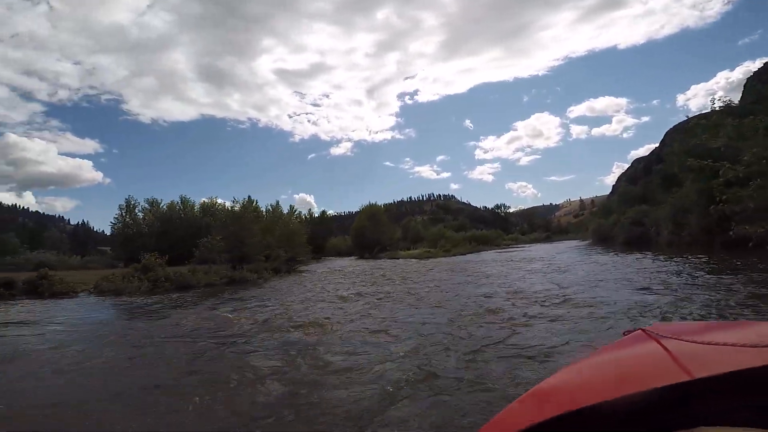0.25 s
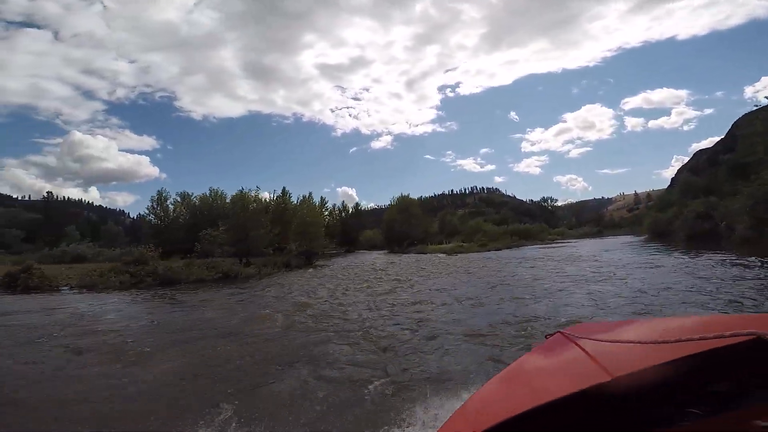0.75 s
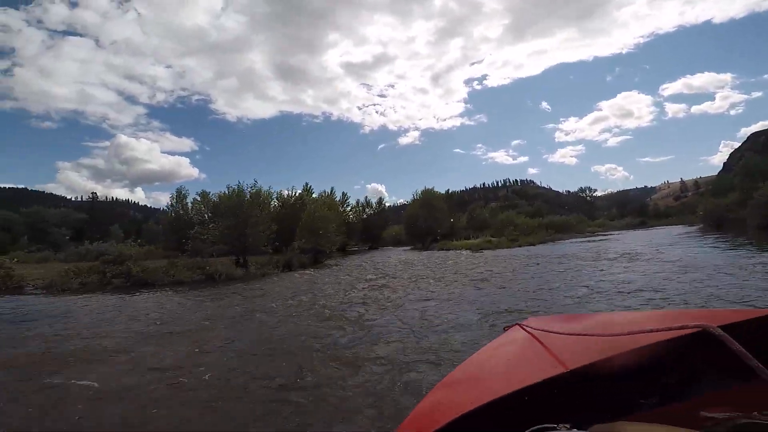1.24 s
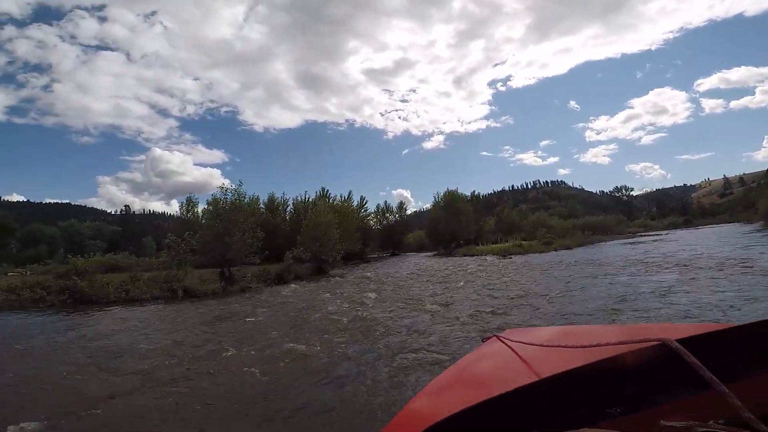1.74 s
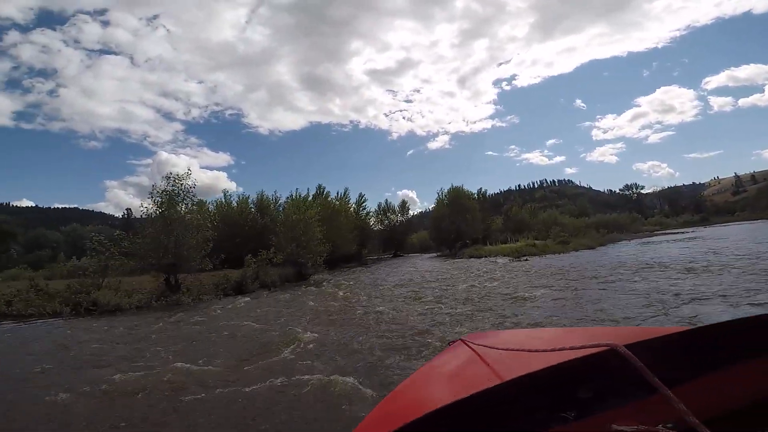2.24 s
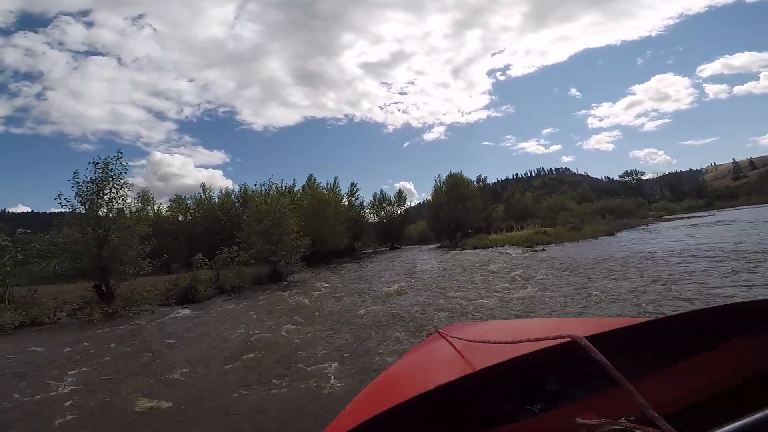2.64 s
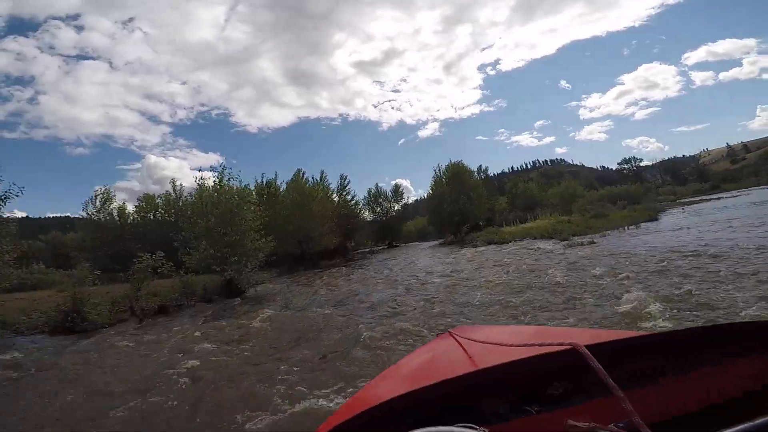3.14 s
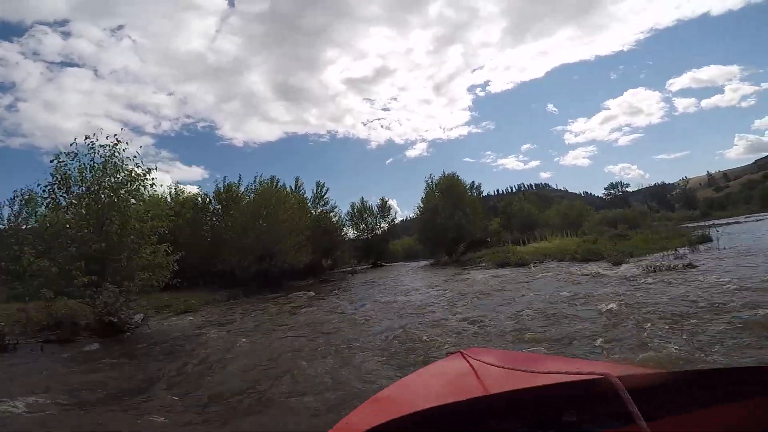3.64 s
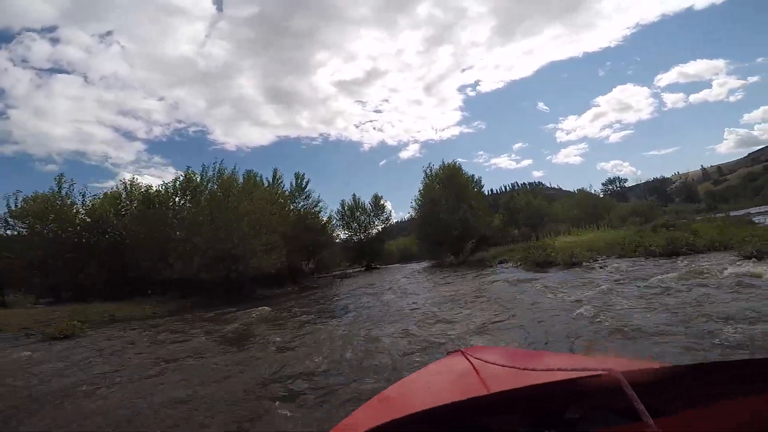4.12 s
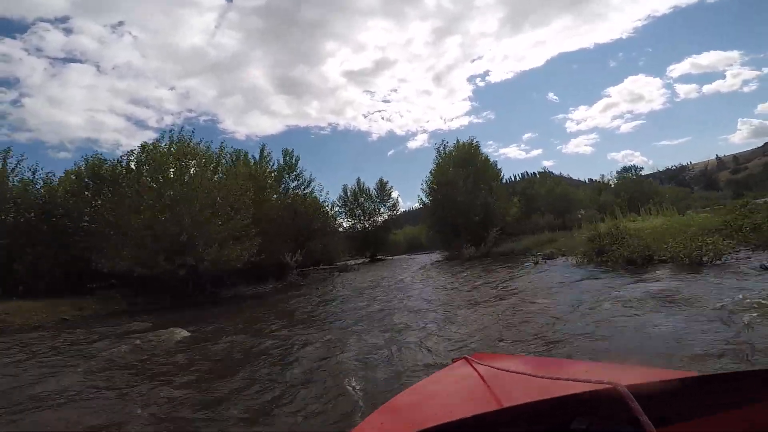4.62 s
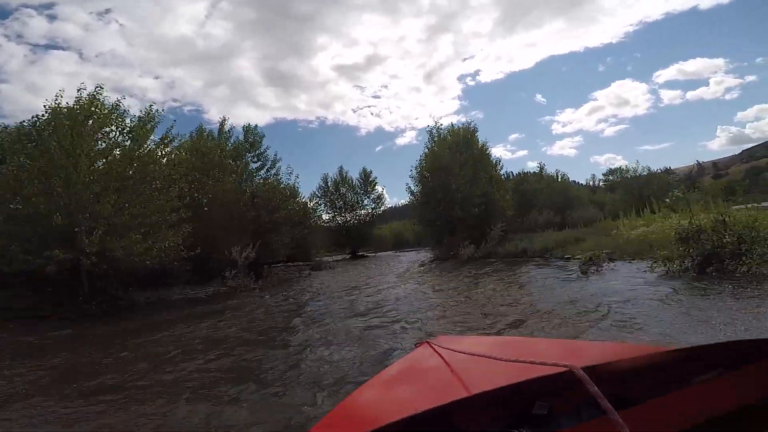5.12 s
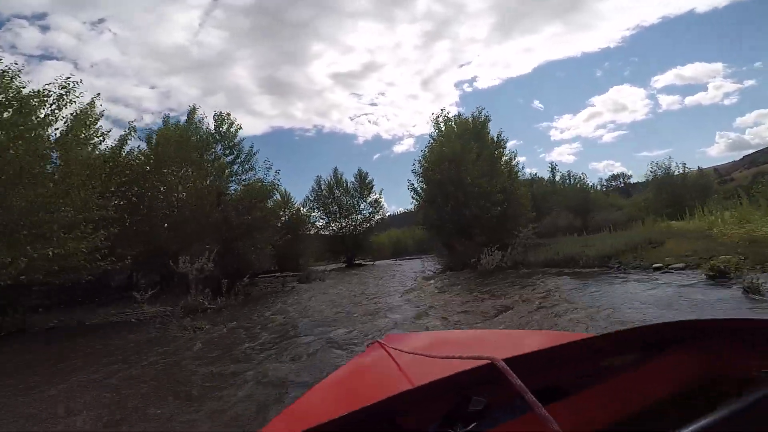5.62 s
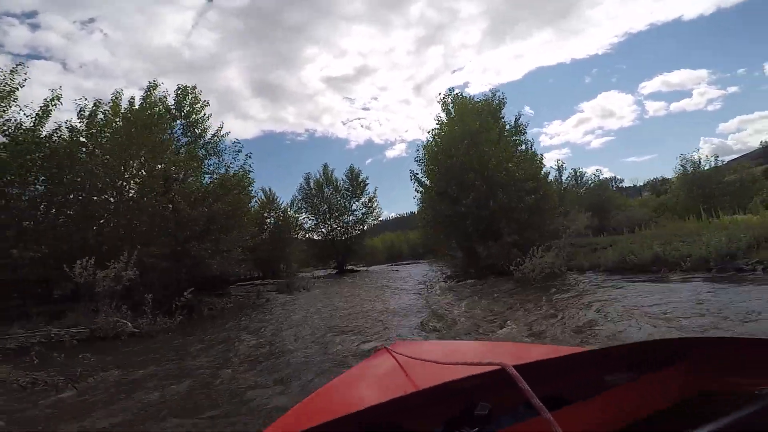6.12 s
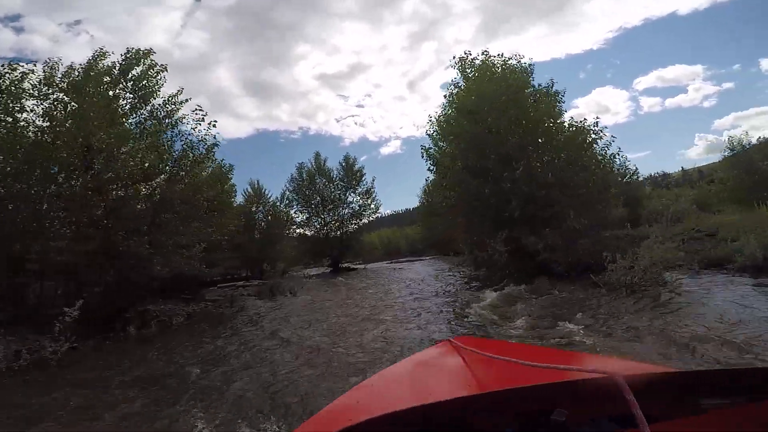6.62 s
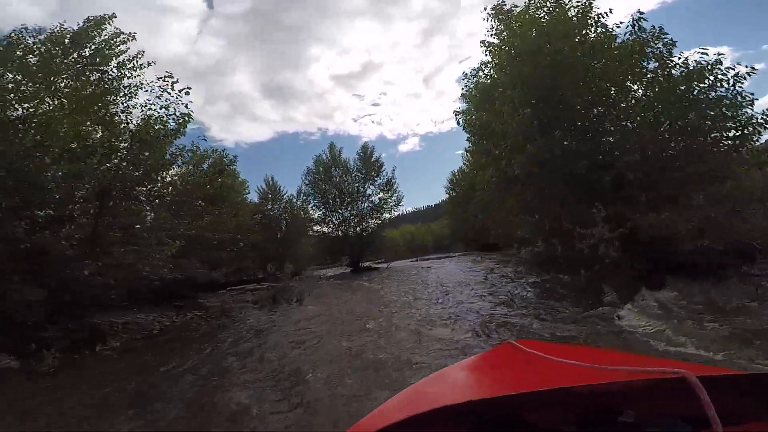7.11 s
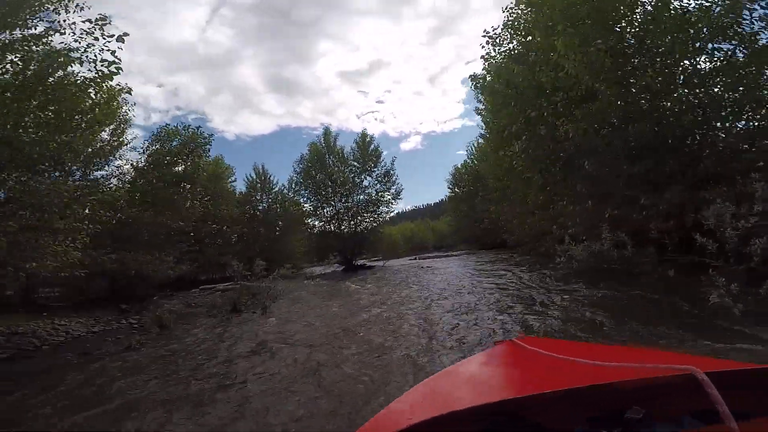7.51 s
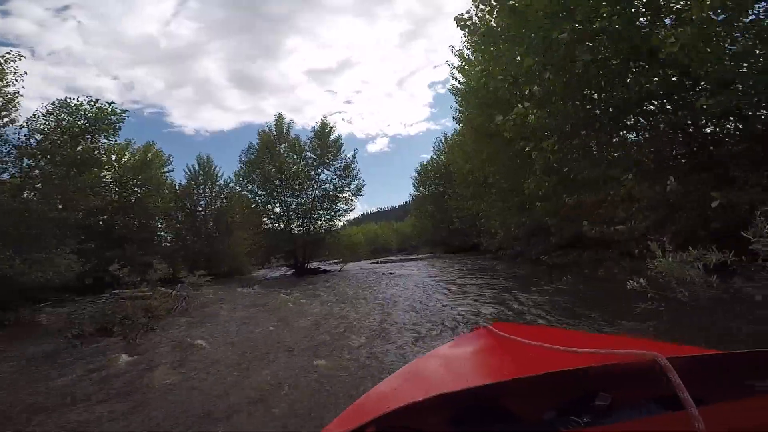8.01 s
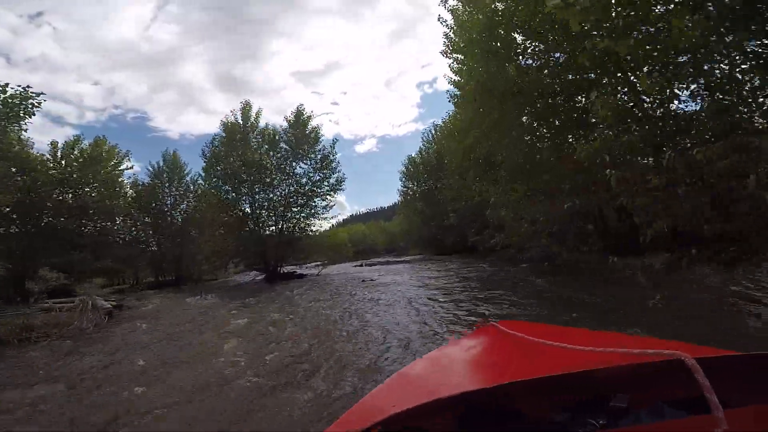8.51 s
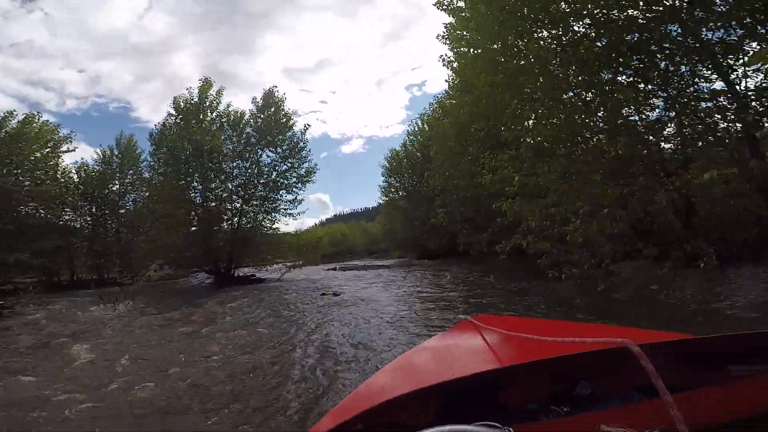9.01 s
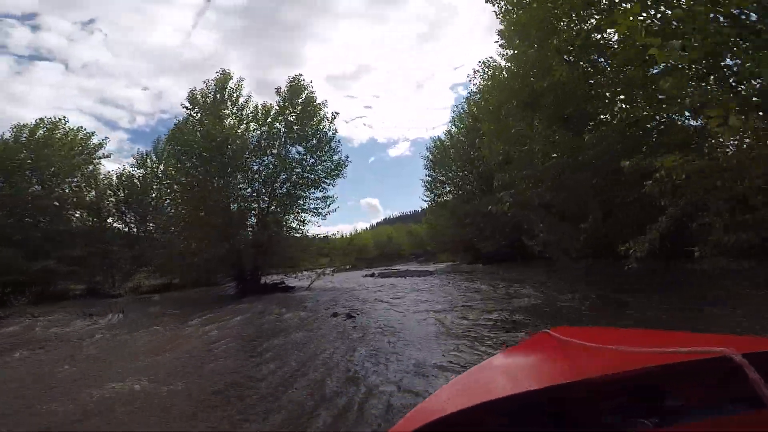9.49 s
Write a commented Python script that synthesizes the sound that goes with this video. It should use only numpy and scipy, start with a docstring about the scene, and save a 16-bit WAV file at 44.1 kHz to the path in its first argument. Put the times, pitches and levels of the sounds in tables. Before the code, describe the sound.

A small jet boat runs along a river, heard from on board. Its exhaust drones and buzzes, revving high at first, easing midway, then surging and dropping several times in quick succession. A rough rumble booms through the hull, spray hisses and wind gusts buffet the microphone. Around the middle, waves slap the bow, it lands with a few deep thumps, and a panel starts ringing in faint metallic squeals.

```python
"""A small jet boat runs up a river, heard from on board. From the start its exhaust drones and barks,
rising and falling with the throttle. A rough, low rumble booms through the hull, water sprays off the bow,
the water jet hisses, wind buffets the microphone and a hull panel rings faintly. At 2.5 seconds the
sound opens from mono to stereo and waves begin to slap the bow. At 3.8 seconds the bow first lands with
a thump, and from about 4.8 seconds the panel rings with the engine in short squeals."""
import sys
import numpy as np
from scipy import signal
from scipy.fft import rfft, irfft, next_fast_len
from scipy.io import wavfile
from scipy.ndimage import uniform_filter1d, minimum_filter1d

SR = 44100
rng = np.random.default_rng(int(sys.argv[2]) if len(sys.argv) > 2 else 0)


def unload_wav(signal):
    """Save mono or channel-first audio to the path in sys.argv[1] as 16-bit WAV at rate SR, clipped to [-1, 1]."""
    wavfile.write(
        sys.argv[1],
        SR,
        np.round(np.clip(np.atleast_2d(signal).T, -1, 1) * 32767).astype(np.int16),
    )


N = 429960


def from_db(db):
    """Turn decibels (dB) into a number to multiply a sound by."""
    return np.exp(np.asarray(db) * (np.log(10) / 20))


def rms_one(x):
    """Scale a sound so that the average of its channels has a strength (rms) of 1."""
    return x / np.sqrt(np.mean(np.atleast_2d(x).mean(axis=0) ** 2) + 1e-20)


def in_time(rows):
    """Join rows of (seconds, value) into a curve with a value for every sample."""
    return np.interp(np.arange(N) / SR, *np.transpose(rows))


def at_hz(rows, hz):
    """Look up a pitch in rows of (Hz, value), giving every octave equal room."""
    row_hz, value = np.transpose(rows)
    return np.interp(np.log(hz), np.log(row_hz), value)


def along(rows, hz):
    """Look up a gliding pitch every 100 samples and fill in between."""
    return np.interp(np.arange(N), np.arange(N)[::100], at_hz(rows, hz[::100]))


def drift(rate_hz):
    """A smooth random wobble of typical size 1; a higher rate makes it quicker."""
    step = 40   # samples per random value
    r = np.exp(-2 * np.pi * step * rate_hz / SR)
    slow = signal.lfilter([1], [1, -2 * r, r * r], rng.standard_normal(N // step + 2002))[2000:]
    return np.interp(np.arange(N) / step, np.arange(len(slow)), rms_one(slow))


def arch(peak_s, length_s):
    """A smooth rise from 0 to 1 and back."""
    return np.cos(np.pi * np.clip((np.arange(N) / SR - peak_s) / length_s, -.5, .5)) ** 2


def swells(rows):
    """A loudness curve with one arch for each row."""
    return sum(from_db(db) * arch(peak_s, length_s) for peak_s, length_s, db in rows)


def resonance(x, hz, width_hz):
    """Keep the part of a sound near one pitch, as a ringing object does."""
    r = np.exp(-np.pi * width_hz / SR)
    feedback = [1, -2 * r * np.cos(2 * np.pi * hz / SR), r * r]
    return signal.lfilter(np.array([1, 0, -1]) * (1 - r * r) / 2, feedback, x)


def split(x, hz):
    """Cut a sound into its parts below and above a pitch."""
    return [signal.sosfilt(signal.butter(3, hz, side, fs=SR, output="sos"), x)
            for side in ("low", "high")]


# Which side is louder. Each row: pitch in Hz, left minus right in dB.
BALANCE = [(60, 2), (160, -1), (270, -1.5), (360, -3), (450, -6), (730, -11.5), (1200, -7.5), (2000, -6),
           (5400, -4.5), (8800, 3), (14600, -6.5)]
# How alike the two sides are. Each row: pitch in Hz, likeness from 0 to 1.
LIKENESS = [(60, .66), (160, 0.89), (370, 0.91), (520, 0.5), (730, .25), (850, .5), (1100, .68),
            (1900, .66), (2600, 0.62), (4000, 0.54), (5000, .22), (7000, 0.49), (9500, 0.35), (11500, .2)]
# How late the left side is. Each row: pitch in Hz, lag in radians (6.28 is one whole wave).
LEFT_LAG = [(60, 0.47), (420, 0.52), (600, 1.23), (730, 1.8), (820, 3.5), (1000, 4), (2000, 4.5),
            (3000, 4.5), (4500, 6.5), (5200, 9), (7000, 9.2), (10000, 9.5), (11500, 11)]
def ports(hz):
    """How the microphone's two openings hear a pitch: left gain, right gain, likeness and lag."""
    left = from_db(at_hz(BALANCE, hz) / 2)
    alike = np.clip(at_hz(LIKENESS, hz), 0, .99)
    lag = at_hz(LEFT_LAG, hz)
    centre = np.sqrt(left ** 2 + left ** -2 + 2 * alike * np.cos(lag)) / 2
    return left / centre, 1 / left / centre, alike, lag


def right_first(x):
    """Sound reaches the right opening before the left one."""
    size = next_fast_len(N)
    hz = np.maximum(np.arange(size // 2 + 1) * SR / size, 1)
    shift = np.exp(.5j * at_hz(LEFT_LAG, hz) * [[-1], [1]])
    return irfft(rfft(x, size) * shift, size)[:, :N]


def stereo_tone(phase, hz, level):
    """One pure tone as it reaches both openings, the right one first."""
    left, right, _, lag = ports(hz[::100])
    left, right, half_lag = (uniform_filter1d(np.repeat(np.float32(curve), 100), 100)[:N]
                             for curve in (left, right, lag / 2))
    phase = np.float32((phase + rng.uniform(0, 2 * np.pi)) % (2 * np.pi))
    return level * np.array([left * np.sin(phase - half_lag), right * np.sin(phase + half_lag)])


def banded_noise(spectrum, flicker_db, flicker_hz):
    """Stereo noise in bands a third of an octave wide, which swell together and flicker on their own."""
    out, together = np.zeros((2, N)), drift(flicker_hz / 2)
    edges = 16 * 2 ** (np.arange(31) / 3)
    white = rng.standard_normal((2, 2, N))
    for k, (low, high) in enumerate(zip(edges, edges[1:])):
        hz = np.sqrt(low * high)
        if spectrum[0][0] < hz < spectrum[-1][0]:
            band = signal.butter(2, [low, high], "band", fs=SR, output="sos")
            mid, side = signal.sosfilt(band, white[k % 2])
            left, right, alike, _ = ports(hz)
            mid, side = mid * np.sqrt(1 + alike), side * np.sqrt(1 - alike)
            level = from_db(at_hz(spectrum, hz) + flicker_db * (together + drift(flicker_hz)))
            out += level * np.array([left * (mid + side), right * (mid - side)])
    return rms_one(right_first(out))


# How fast the engine runs. Each row: time in seconds, crankshaft turns per second.
ENGINE_SPEED = [(0.0, 37), (0.1, 46), (0.19, 60), (0.28, 64.8), (0.38, 64.5), (0.5, 62.7), (0.65, 68.4),
                (0.82, 75.0), (0.95, 80.3), (1.2, 82), (1.7, 79.5), (2.08, 76.7), (2.2, 71.7), (2.35, 65.2),
                (2.5, 72.4), (2.66, 81.6), (2.85, 87.5), (3.06, 90.7), (3.2, 91.4), (3.36, 88.7),
                (3.48, 79.3), (3.62, 63.7), (3.75, 57.2), (4.02, 62), (4.21, 59.6), (4.35, 55.5),
                (4.46, 51.3), (4.6, 47.3), (4.78, 40.7), (5.07, 44), (5.2, 52), (5.32, 59), (5.45, 61.5),
                (5.7, 63), (5.95, 62.9), (6.22, 59.6), (6.38, 52), (6.5, 49.2), (6.62, 53.4), (6.8, 63.4),
                (6.95, 71.3), (7.05, 72.3), (7.12, 54.8), (7.22, 42.2), (7.34, 35.2), (7.48, 29.1),
                (7.64, 44.6), (7.74, 57.2), (7.84, 65.2), (8.0, 65.7), (8.12, 55.9), (8.26, 49.6),
                (8.38, 55), (8.53, 64.8), (8.78, 80.5), (8.93, 84.6), (9.0, 76.4), (9.1, 55.6), (9.25, 41),
                (9.45, 32.4), (9.56, 41), (9.66, 56), (9.75, 59.0)]
# How hard the engine works. Each row: time in seconds, level of its bark in dB.
ENGINE_LOAD = [(0, -31.5), (.15, -33), (.4, -28.5), (.78, -23.5), (1, -29.5), (1.65, -29), (2.1, -27.5),
               (2.57, -28.5), (2.68, -31), (2.96, -33), (3.06, -28.5), (3.33, -28.5), (3.46, -33),
               (3.66, -30.5), (3.9, -30.5), (4.55, -27.5), (4.8, -30.5), (5.3, -27.5), (5.6, -27.5),
               (6.05, -26), (6.35, -27), (6.6, -29), (6.8, -26.5), (7.03, -24.5), (7.3, -37), (7.6, -28),
               (8.45, -30), (8.66, -22.5), (8.84, -27), (8.97, -25.5), (9.1, -44), (9.4, -36.5),
               (9.58, -30), (9.75, -29)]
BEST_SPEED = 58.6   # turns per second; below this the exhaust's tones fade
def throttle(flywheel_s=.06, pull_db=0.1, drop_db=2.5, coast_below_db=-31.5):
    """The flywheel smooths the speed; effort rises a little with the revs and sinks off the throttle."""
    speed = uniform_filter1d(in_time(ENGINE_SPEED), int(flywheel_s * SR), mode="nearest")
    surge = np.tanh(np.gradient(speed) * SR / 31)   # +1 revving up, -1 dropping back
    load_db = in_time(ENGINE_LOAD)
    coasting_db = 0.99 * np.minimum(load_db - coast_below_db, 0)
    effort_db = np.where(surge > 0, pull_db, drop_db) * surge + coasting_db
    return speed, surge, load_db, effort_db


def crankshaft(speed, roughness, wobble=0.00091, stumble=.003):
    """The shaft's angle; its speed wavers a little, and stumbles more when the rumble is strong."""
    waver = (wobble + stumble * roughness ** 2) * drift(13.6)
    return 2 * np.pi * np.cumsum(speed * (1 + waver)) / SR


# Pitches at which exhaust and cockpit ring. Each row: pitch in Hz, width in Hz, level in dB.
DRONE_RESONANCES = [(70.5, 16.2, -13), (106.2, 25, -15.5), (137.2, 16, -16), (159.8, 46.4, -11),
                    (183.4, 16, -13.5), (218, 30, -13.5), (248.6, 8.6, -15), (262.5, 29, -8.5),
                    (325.9, 18.5, -9.5), (352.2, 25.2, -7), (400.3, 28, -10), (446, 35.3, -12),
                    (473.9, 14.8, -13.5), (501, 14, -17.5), (561.7, 40.6, -19)]
# Pitches at which the cockpit cancels the drone. Each row: pitch in Hz, width in Hz, change in dB.
DEAD_SPOTS = [(375, 10, -2), (493, 8, -7.5), (519, 13, -8)]
def cockpit_gain(hz):
    """How strongly exhaust and cockpit carry a tone gliding through their resonances and dead spots."""
    def nearness(centre, width):
        return 1 / (1 + (2 * (hz[::100] - centre) / width) ** 2)
    power = sum((from_db(db) * nearness(centre, width)) ** 2 for centre, width, db in DRONE_RESONANCES)
    dead_db = sum(db * nearness(centre, width) for centre, width, db in DEAD_SPOTS)
    return np.interp(np.arange(N), np.arange(N)[::100], np.sqrt(power) * from_db(dead_db))


# The exhaust's strong tones. A tone's "order" is its waves per turn of the shaft; 2 is the firing rate.
# Each row: order, relative level in dB, dB lost for each turn per second below the best speed.
FIRING_ORDERS = [(1, -4, 0.5), (2, 1.34, 0.2), (4, 0.47, 0.14), (6, 0, 0.47), (8, -1, 0.38)]
# The deep once-per-turn tone, which fades at full revs. Each row: time in seconds, change in dB.
LOWEST_TONE = [(0, -2), (.7, 1), (1.2, -3.5), (2.2, 2.5), (2.65, 1), (2.92, -9.5), (3.6, -5), (8.3, -5),
               (8.78, -12), (9.3, -3)]
# One tone dips briefly. Each row: middle in seconds, length in seconds, change in dB, order.
DIPS = [(.35, 0.64, -10, 2), (.82, 0.081, -16, 2), (2.15, 0.078, -18, 2), (2.3, .09, -13, 2),
        (2.5, 0.1, -16, 4), (3.17, .09, -7, 2), (3.404, 0.056, -10, 4), (6.96, .1, -9, 4),
        (7.854, 0.12, -13, 2), (8.91, .06, -8, 2)]
# Weaker tones from unequal cylinders. Each row: pitch in Hz, relative level in dB.
UNEVEN_SPECTRUM = [(120, -26.5), (240, -25.5), (400, -33), (480, -33.5), (540, -45.5), (620, -45.5)]
def drone(crank, speed, effort_db, roughness):
    """Engine firings make the exhaust hum; the hum flutters more when the rumble is strong."""
    out = np.zeros((2, N))
    slack = np.maximum(BEST_SPEED - speed, 0)
    for order, db, loss_db in FIRING_ORDERS:
        k = round(order)
        if k == 1:
            change_db = in_time(LOWEST_TONE)
        else:
            change_db = sum(dip_db * arch(s, length)
                            for s, length, dip_db, dip_order in DIPS if round(dip_order) == k)
        flutter_db = (1 + 1.8 * roughness) * drift(11)
        level = from_db(0.98 + db + change_db + effort_db - loss_db * slack + flutter_db)
        out += stereo_tone(k * crank, k * speed, level * cockpit_gain(k * speed))
    for k in (3, 5, 7, 9, 10, 11, 12):
        db = along(UNEVEN_SPECTRUM, k * speed) + effort_db - 5.5 + 3.5 * roughness
        out += stereo_tone(k * crank, k * speed, from_db(db + 3 * drift(5.1)))
    return out


# The exhaust's high, buzzing tones. Each row: pitch in Hz, relative level in dB.
BARK_SPECTRUM = [(480, -2.5), (570, 5.5), (650, 1), (730, -0.5), (810, 2.5), (890, -1.5), (950, -5.5),
                 (1008, 0), (1070, -8.5), (1140, -1.5), (1200, -6.5), (1290, -9), (1500, -12.5),
                 (2100, -17.5), (2900, -23.5)]
# The exhaust's rushing gas. Each row: pitch in Hz, relative level in dB.
RASP_SPECTRUM = [(400, -7), (520, 8), (780, -1), (1000, -2), (1250, -3.5), (1500, -10), (2100, -11.5),
                 (2900, -22.5), (5000, -23)]
def bark(crank, speed, roughness, odd_order_db=-3.0, idle_loss_db=0.4):
    """The exhaust buzzes, less so towards idle, and lets out a puff of gas with each firing."""
    buzz = np.zeros((2, N))
    shaky_crank = crank + .018 * drift(60)
    for k in range(7, 33):
        hz = k * speed
        db = along(BARK_SPECTRUM, hz) + odd_order_db * (k % 2) + 4 * drift(7.7)
        fade_in = np.clip((hz - 500) / 60, 0, 1)   # the drone takes over below 500 Hz
        buzz += stereo_tone(k * shaky_crank, hz, from_db(db) * fade_in)
    buzz = rms_one(buzz) * from_db(-idle_loss_db * np.maximum(BEST_SPEED - speed, 0))
    puffs = 1 + 0.22 * np.cos(2 * crank) + 0.057 * np.cos(crank)
    rasp = banded_noise(RASP_SPECTRUM, flicker_db=1.07, flicker_hz=25) * puffs
    rasp_gain = from_db(-4.5 + 4.5 * roughness)
    return rms_one((buzz + rasp_gain * rasp) / np.sqrt(1 + rasp_gain ** 2))


# The rough, low rumble in the hull, strongest at low revs. Each row: time in seconds, level in dB.
RUMBLE_LEVEL = [(0, -19.5), (.15, -16.5), (.45, -24), (.82, -24), (1.15, -36), (1.6, -32.5), (2.25, -22),
                (2.55, -23), (2.72, -28.5), (2.97, -29), (3.3, -22), (3.5, -18), (3.87, -19.5),
                (4.25, -15.5), (4.6, -15), (4.85, -21), (5.15, -15.5), (5.6, -20.5), (5.85, -20),
                (6.2, -15.5), (6.65, -19), (6.85, -18.5), (7.35, -19.5), (7.6, -17.5), (7.95, -21.5),
                (8.15, -14.5), (8.55, -20), (8.8, -31), (9.02, -20.5), (9.3, -21), (9.75, -17.5)]
def rumble_strength():
    """The rumble's level, both in dB and as "roughness", which is 1 at its loudest."""
    rumble_db = in_time(RUMBLE_LEVEL)
    return rumble_db, from_db(rumble_db - rumble_db.max())


# The tone colour of the rumble. Each row: pitch in Hz, relative level in dB.
RUMBLE_SPECTRUM = [(25, -19), (50, -8.5), (70, -2), (100, -0.5), (160, 1.5), (240, 1), (300, -1.5),
                   (370, 3), (470, -4), (560, -13), (800, -20.5), (1500, -30), (4000, -72)]
# Pitches at which hull and cockpit boom. Each row: pitch in Hz, width in Hz, relative level in dB.
BOOMS = [(69.5, 8.2, -14.5), (161.2, 3.8, 0), (205, 23, -9.5), (405, 12, -8), (444.2, 17, 1),
         (473, 12, 2.5), (829, 27, 7), (1008, 25, 4)]
def hull_rumble(rumble_db, surge, upper_offset_db=-7.5, surge_db=4.5):
    """A rough, low rumble booms through the hull; its upper part grows while the revs change."""
    noise = banded_noise(RUMBLE_SPECTRUM, flicker_db=1.5, flicker_hz=13.6)
    booming = noise + sum(from_db(db) * resonance(noise, hz, width) for hz, width, db in BOOMS)
    deep, upper = split(booming, hz=260)
    upper_db = rumble_db + upper_offset_db + surge_db * np.abs(surge)
    return from_db(rumble_db) * rms_one(deep) + from_db(upper_db) * rms_one(upper)


# How hard the bow sprays. Each row: time in seconds, relative level in dB.
SPRAY_LEVEL = [(0, -44.5), (.17, -48), (.8, -46.5), (1.02, -52.5), (1.65, -51.5), (2, -47.5), (2.85, -48.5),
               (2.96, -54.5), (3.06, -48), (3.3, -50), (3.5, -46.5), (3.85, -45), (4.35, -43), (4.58, -44),
               (4.8, -44.5), (4.97, -41.5), (5.35, -45), (5.55, -44), (5.95, -44.5), (6.38, -42.5),
               (6.65, -47.5), (6.95, -42), (7.22, -44.5), (7.48, -39), (7.8, -45), (8, -42), (8.4, -43.5),
               (8.72, -41.5), (9.12, -46), (9.55, -41.5), (9.75, -41)]
# The hiss of the drops. Each row: pitch in Hz, relative level in dB.
SPRAY_SPECTRUM = [(300, -11.5), (1000, 3.5), (2000, 1.5), (3000, -0.5), (4700, -2.5), (6100, 2.5),
                  (7400, -8), (8500, -16), (10500, -22.5), (11500, -27), (13000, -26.5), (15000, -32)]
def spray(grain_db=0.65, brighten=0.18):
    """Sheets of water break into a dense hiss of drops; harder spray makes finer, brighter drops."""
    spray_db = in_time(SPRAY_LEVEL)
    drops = banded_noise(SPRAY_SPECTRUM, flicker_db=0.7, flicker_hz=32) * from_db(grain_db * drift(250))
    coarse, fine = split(drops, hz=7400)
    fine_db = brighten * (spray_db - spray_db.mean()) + 1.2 * drift(8)
    return from_db(spray_db + 2.5) * rms_one(coarse + from_db(fine_db) * fine)


# The hiss of the water jet. Each row: pitch in Hz, relative level in dB.
JET_SPECTRUM = [(3000, -9), (4000, 0), (5200, -21), (6200, -6), (7000, -8), (8200, -20.5), (11000, -32.5),
                (12800, -15), (15000, -27.5)]
def water_jet(speed, level_db=-62):
    """The jet that drives the boat hisses steadily, a tiny bit louder at high revs."""
    level = from_db(level_db + 0.0044 * (speed - BEST_SPEED))
    return level * banded_noise(JET_SPECTRUM, flicker_db=0, flicker_hz=12)


# Gusts of wind. Each row: peak in seconds, length in seconds, level in dB.
GUSTS = [(.06, .25, -33), (.8, .2, -24), (2.2, 0.37, -27.5), (2.56, 0.26, -24.5), (3.28, 0.21, -26),
         (4.35, 0.76, -26), (6.14, 0.14, -32), (6.9, 0.33, -28), (7.58, 0.29, -23), (8.2, 0.24, -22.5),
         (9.7, .37, -30)]
# The tone colour of the wind. Each row: pitch in Hz, relative level in dB.
WIND_SPECTRUM = [(15, -14.5), (28, -10.5), (45, -2.5), (65, 3.5), (100, -10), (250, -30), (1000, -66.5)]
def wind(rumble_db, breeze_db=-11):
    """Air buffets the microphone in gusts, over a breeze whose level follows the hull's rumble."""
    level = from_db(rumble_db + breeze_db) + swells(GUSTS)
    return level * banded_noise(WIND_SPECTRUM, flicker_db=2.5, flicker_hz=9.4)


# The hull panel sings out. Each row: peak in seconds, length in seconds, relative level in dB.
SQUEALS = [(4.86, 0.098, -28), (5.03, .55, -38), (5.68, .32, -32.5), (6.04, 0.21, -39), (6.57, .16, -40.5),
           (7.7, .26, -37), (8.1, 0.12, -35.5), (8.4, 0.19, -38), (9.66, .19, -35)]
def panel(rumble_db, pitch_hz=1127, idle_db=-23.5):
    """A panel on the right rings with the engine in metallic squeals: ragged if faint, purer if loud."""
    level = from_db(rumble_db + idle_db) + swells(SQUEALS)
    ragged = np.clip(20 * np.log10(level.max() / level) / 12, .5, 1.2)
    hz = pitch_hz + 24.4 * ragged * drift(60)
    rattle = from_db(2 + 3 * ragged * drift(70))
    return rattle * stereo_tone(2 * np.pi * np.cumsum(hz) / SR, hz, level)


# Waves slap the bow. Each row: start in seconds, level in dB, fade in seconds, pitch in Hz, width in Hz.
SLAPS = [(2.585, -36.5, .015, 1900, 1200), (4.225, -20, 0.0071, 800, 700), (4.543, -29, .016, 2000, 1400),
         (4.578, -38, 0.014, 4500, 6000), (4.661, -23.5, 0.026, 900, 1000),
         (4.670, -25, 0.0068, 2200, 4500), (5.245, -36, 0.036, 2500, 4000), (5.268, -26, .016, 1500, 1100),
         (6.113, -21.5, .006, 800, 800), (8.735, -32, .03, 1699, 1501)]
def slaps(attack_s=.001):
    """Each wave bursts on the bow with a short splash around its own pitch."""
    t, out = np.arange(N) / SR, np.zeros((2, N))
    noise = signal.sosfilt(signal.butter(4, 7500, fs=SR, output="sos"), rng.standard_normal((2, N)))
    for start, db, fade_s, hz, width in SLAPS:
        age = np.maximum(t - start, 0)
        burst = (1 - np.exp(-age / attack_s)) * np.exp(-np.minimum(age / fade_s, 20))
        splash = rms_one(resonance(resonance(noise, hz, width), hz, width))
        out += from_db(db) * burst * splash
    return out


# The bow lands on a wave. Each row: start in seconds, level in dB, pitch in Hz.
THUMPS = [(3.805, -8.5, 77), (4.653, -11, 72), (5.264, -10, 63.3), (6.925, -21, 62.1)]
def thumps(rise_s=0.025):
    """The bow comes down on a wave and the bottom gives one deep, dying boom."""
    t, out = np.arange(N) / SR, np.zeros(N)
    for start, db, hz in THUMPS:
        age = np.maximum(t - start, 0)
        rise = np.minimum(age / rise_s, 30)
        out += from_db(db) * rise * np.exp(1 - rise) * np.sin(2 * np.pi * hz * age)
    return out


def scene():
    """Add up engine, hull, water and wind around the microphone."""
    speed, surge, load_db, effort_db = throttle()
    rumble_db, roughness = rumble_strength()
    crank = crankshaft(speed, roughness)
    engine = drone(crank, speed, effort_db, roughness) + from_db(load_db) * bark(crank, speed, roughness)
    hull = panel(rumble_db) + hull_rumble(rumble_db, surge)
    water = spray() + slaps() + thumps() + water_jet(speed)
    return engine + hull + water + wind(rumble_db)


# How wide the sound is. Each row: time in seconds, width from 0 (mono) to 1 (full stereo).
STEREO_WIDTH = [(0, .13), (.4, 0), (2.45, 0), (2.65, 0.23), (3.1, 0.66), (3.6, 0.9), (4.6, 1), (9.75, 0.85)]
def record(dry, ceiling=.95, hold_s=0.046, cutoff_hz=15000):
    """The sound opens to stereo, a fast limiter turns down the peaks and the highest treble is cut."""
    width = np.clip(in_time(STEREO_WIDTH), 0, 1)
    mid, side = dry.mean(axis=0), (dry[0] - dry[1]) / 2
    # in mono the treble is slightly hollow
    mid = mid - (1 - width) * 0.41 * resonance(mid, hz=5400, width_hz=1100)
    stereo = from_db(1.2) * (mid + width * side * [[1], [-1]])
    hold = int(hold_s * SR)
    safe_gain = ceiling / np.maximum(np.abs(stereo).max(axis=0), ceiling)
    gain = uniform_filter1d(minimum_filter1d(safe_gain, hold), hold)
    soft_ends = signal.windows.tukey(N, .0006)
    treble_cut = signal.ellip(10, .1, 80, cutoff_hz, fs=SR, output="sos")
    return signal.sosfilt(treble_cut, stereo * gain * soft_ends)


dry = scene()
out = record(dry)
unload_wav(out)
```